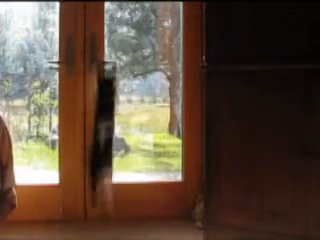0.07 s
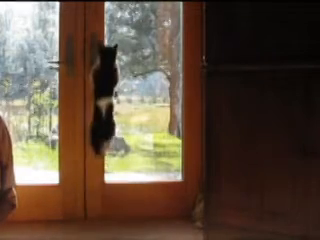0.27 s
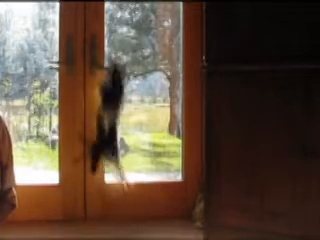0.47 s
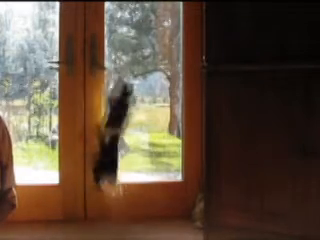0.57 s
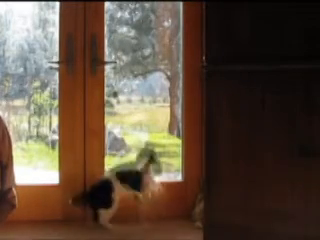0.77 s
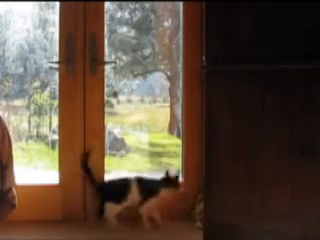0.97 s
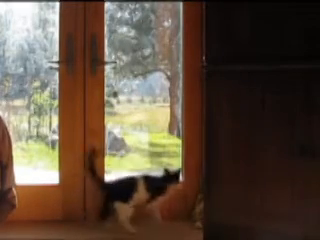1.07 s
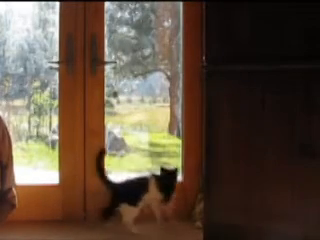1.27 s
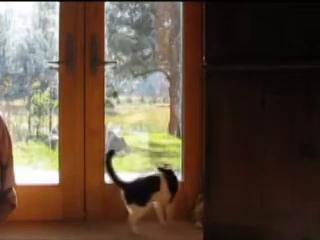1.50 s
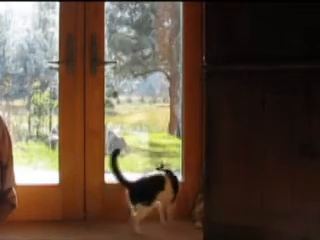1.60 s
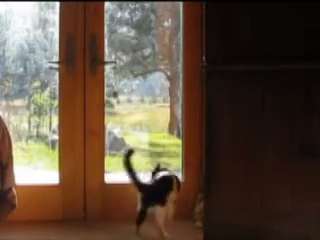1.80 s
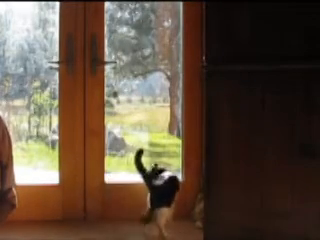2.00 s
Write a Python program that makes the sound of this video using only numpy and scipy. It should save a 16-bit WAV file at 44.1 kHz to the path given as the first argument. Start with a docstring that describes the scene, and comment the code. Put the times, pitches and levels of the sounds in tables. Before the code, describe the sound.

Quick thumps and rattles come from a glass door as a cat jumps at it, claws clicking. A thud on the floor follows, then soft footfalls and one faint mew, over the hum and hiss of a quiet room.

```python
"""Over the low hum and hiss of a quiet room, a cat leaps at a glazed wooden door.
Each impact shoves the door, excites the modes of its wood and rattles pane and handle; claws tick
and paws slide down the glass. The cat lands, the floor thuds and clatters, and the room reverberates.
It walks off with soft footfalls and mews faintly, the overtones swelling as its mouth opens."""
import sys
import numpy as np
from scipy import signal
from scipy.fft import rfft, irfft
from scipy.io import wavfile
from scipy.ndimage import uniform_filter1d

SR = 44100
rng = np.random.default_rng(int(sys.argv[2]) if len(sys.argv) > 2 else 0)


def generate_wav(signal):
    """Clip the signal to [-1, 1] and save it as 16-bit WAV at the path in sys.argv[1]."""
    frames = np.transpose(np.atleast_2d(signal))
    scaled = np.clip(frames, -1, 1) * 32767
    pcm = np.round(scaled).astype(np.int16)
    wavfile.write(sys.argv[1], SR, pcm)


N = 90404
DECAY_SAMPLES = 36000
SHOVE_RISE_S = 0.0056

# low modes of the floor (frequency [Hz], level [dB], t60 [s])
FLOOR_SWAY = [(31.94, -11, 1), (47.3, -12, 0.35), (70.85, -10, 0.96), (91.1, 0.5, 0.37),
              (110.6, -10.5, 0.22), (129, -14.5, .6)]


def door():
    """Impact excitation: the cat sets the door vibrating, and the loose pane and handle rattle."""
    # impacts (time [s], shove level [dB], knock level [dB], rattle level [dB])
    hits = [(.208, -30, -31, -44), (.213, -22, -34.5, -41), (.226, -19.5, -30.5, -56),
            (.237, -19.5, -27, -25), (.263, -15.5, -31.5, -38), (.427, -20, -61, -18.5),
            (.432, -18, -19.5, -11), (.4375, -24, -15.5, -16.5), (.445, -13.5, -18.5, -12.5),
            (.451, -28, -25, -11), (.463, -9, -33, -12), (.469, -9, -20.5, -13.5), (.495, -17, -34.5, -28),
            (.503, -12, -22.5, -48), (.551, -12.5, -30, -45)]
    # low modes of the whole door (frequency [Hz], level [dB], t60 [s])
    sway = [(14, -3.5, 1), (30.6, -10, 0.26), (39, -6.5, .35), (53.3, -0.5, 0.068), (96.3, -5.5, 0.94),
            (112, -2.5, 0.083)]
    # modes of the wood (frequency [Hz], level [dB], t60 [s])
    modes = [(180.5, -4, 0.43), (210.5, -7.5, 0.24), (305, -3, 0.26), (323, -15, 0.9), (356, -12.5, 0.91),
             (447, -9, 0.12), (519, -15.5, 0.64), (581, -24.5, 0.49), (710, -33, 0.13), (813, -18.5, 0.21),
             (1106, -9, 0.063)]
    # resonances driven by the rattle (frequency [Hz], t60 before the cap [s], gain [dB])
    peaks = [(1342, .25, -10), (3521, 0.087, 6), (3920, 0.15, -9), (4060, 0.083, -1), (4786, 0.12, 0),
             (5520, 0.28, 3), (5556, .15, 10)]
    # rattle spectrum (frequency [Hz], level [dB])
    spectrum = [(60, -25), (250, 10), (600, 7.5), (900, -8.5), (1500, -0.5), (3000, 2), (4500, -2),
                (7000, -7.5), (9000, -14.5), (12000, -16.5)]
    return impacts(hits, sway, modes, peaks, spectrum, t60=0.039, room_db=-14.5)


def landing():
    """Impact excitation: paws and body strike the floor, which rings in its damped modes."""
    # impacts (time [s], shove level [dB], knock level [dB], clatter level [dB])
    hits = [(.662, -13, -73, -77), (.686, -15.5, -29, -28), (.690, -17.5, -26, -15),
            (.695, -28, -31.5, -11.5), (.702, -22.5, -13, -9.5), (.7105, -15.5, -16, -18.5),
            (.717, -47, -19.5, -10.5), (.738, -21, -18, -22), (.762, -47, -27, -23),
            (.775, -26.5, -19, -27), (.836, -28, -25, -30.5), (.848, -28.5, -37.5, -36),
            (.868, -29.5, -28.5, -48), (.908, -25.5, -50, -67)]
    # modes of the floor's wood (frequency [Hz], level [dB], t60 [s])
    modes = [(166.4, -20, 0.97), (217.5, -4.5, 0.19), (301, -6.5, 0.54), (343.1, -11.5, 0.49),
             (423, -22, 1), (465, -19, 0.39), (522, -13, 0.34), (601, -15, 0.31), (770, -15.5, 0.21),
             (820, -6.5, 0.12), (1020, -7, 0.14), (1173, -16.5, 0.24)]
    # resonances driven by the clatter (frequency [Hz], t60 before the cap [s], gain [dB])
    peaks = [(1840, 0.32, 2.7), (2070, 0.53, 2.3), (2270, 0.1, 2.3), (2380, 0.36, 1.7), (2900, 0.12, 3),
             (3155, 0.55, 2.7), (3918, 0.11, 3), (4145, 0.59, 2.6)]
    # clatter spectrum (frequency [Hz], level [dB])
    spectrum = [(60, 6), (250, 8), (600, -0.5), (1000, -1), (1500, 2), (2800, 0), (4300, 1), (5800, -6.5),
                (8000, -10), (12000, -16)]
    return impacts(hits, FLOOR_SWAY, modes, peaks, spectrum, t60=0.05, room_db=-8)


def impacts(hits, sway, modes, peaks, spectrum, t60, room_db):
    """Superposition: each blow adds a shove, a knock and a clatter that drives high resonances."""
    # spectrum of a knock's dull core (frequency [Hz], level [dB])
    thump_spectrum = [(60, 6), (170, -32), (320, 9), (430, -11), (570, 1), (720, -11), (1200, -9.5),
                      (3000, -23), (12000, -75)]
    body, clatter = np.zeros((2, 2, N))
    shove, knock = ring(sway, SHOVE_RISE_S), ring(modes, rise_s=0.00033)
    for s, shove_db, knock_db, clatter_db in hits:
        thump = amp(-0.5) * contact(thump_spectrum, t60=0.13, room_db=-20)
        add(body, s, amp(shove_db) * shove + amp(knock_db) * (knock + thump))
        add(clatter, s, amp(clatter_db) * contact(spectrum, t60, room_db))
    for hz, peak_t60, db in peaks:
        q = np.pi * hz * min(peak_t60, 0.3) / np.log(1000)  # t60 capped at 0.3 s
        body += amp(db) * signal.lfilter(*signal.iirpeak(hz, q, fs=SR), clatter)
    return body + clatter


def contact(spectrum, t60, room_db):
    """Exponential decay: a collision radiates a noise burst, followed by the room's reverberation."""
    t = np.arange(DECAY_SAMPLES) / SR
    direct = noise(spectrum, DECAY_SAMPLES) * amp(-60 * t / t60) * onset(t, rise_s=0.0005)
    return direct + amp(room_db) * room_tail(spectrum) * onset(t, rise_s=0.0033)


def ring(modes, rise_s):
    """Modal vibration: a struck object sounds as a sum of damped sinusoids."""
    t = np.arange(DECAY_SAMPLES) / SR
    partials = (amp(db - 60 * t / t60) * np.sin(2 * np.pi * hz * t) for hz, db, t60 in modes)
    return onset(t, rise_s) * sum(partials)


def claws():
    """Impact and friction: claws tick on glass and handle, and paws scrape down the pane."""
    # claw strikes (time [s], level [dB])
    ticks = [(.2355, -20), (0.2389, -19), (0.2444, -22), (0.4258, -24), (.433, -37), (0.4456, -28),
             (.464, -28), (0.479, -14.5), (.540, -15), (0.543, -31), (0.569, -28), (0.5972, -20)]
    # tick spectrum (frequency [Hz], level [dB])
    tick_spectrum = [(200, 29), (1000, 7.5), (2000, 14.5), (4000, 11.5), (6000, 10.5), (7600, 10),
                     (9000, -2), (12000, -0.5)]
    # paw slides (time [s], duration [s], level [dB])
    slides = [(0.282, 0.18, -45.5), (0.51, 0.24, -47.5)]
    # friction spectrum (frequency [Hz], level [dB])
    slide_spectrum = [(200, -10), (1000, -2), (3000, -7), (5500, -2.5), (8000, -17), (12000, -22)]
    out = np.zeros((2, N))
    for s, db in ticks:
        add(out, s, amp(db) * contact(tick_spectrum, t60=0.022, room_db=-20))
    for s, duration, db in slides:
        add(out, s, amp(db) * swell(noise(slide_spectrum, DECAY_SAMPLES), duration))
    return out


def footfalls():
    """Soft contact: a gently applied force excites only the floor's low modes."""
    # steps (time [s], level [dB])
    steps = [(1.045, -31.5), (1.185, -37), (1.315, -31.5), (1.386, -36.5), (1.855, -39)]
    out, shove = np.zeros((2, N)), ring(FLOOR_SWAY, SHOVE_RISE_S)
    for s, db in steps:
        add(out, s, amp(db) * shove)
    return out


def mew():
    """Voiced sound: a harmonic series with some rasp, whose overtones swell as the mouth opens."""
    # course of the call (time [s], pitch [Hz], level [dB], overtone gain [dB])
    call = [(1.699, 843, -50, -6), (1.735, 890, -50, -2), (1.761, 897, -37, -3), (1.801, 946, -43.5, -0.5),
            (1.83, 967, -44.5, 11.5), (1.87, 946, -39, -3.5), (1.901, 895, -38.5, -6.5),
            (1.94, 894, -35.5, -11), (1.969, 903, -35, -20), (2.004, 885, -51, -5),
            (2.017, 886, -36.5, -24), (2.05, 899, -36.5, -14)]
    # harmonics from the fundamental up (level [dB])
    harmonics = [1.5, 1.5, -12.5, -22]
    # rasp spectrum (frequency [Hz], level [dB])
    rasp_spectrum = [(200, -30), (900, 5), (1500, -2.5), (1900, 3.5), (2400, -12), (3000, -1), (4000, -9.5),
                     (5500, -14), (12000, -26)]
    t = np.arange(N) / SR
    s, hz, db, mouth_db = np.transpose(call)
    phase = wavering_phase(np.interp(t, s, hz), wander=0.0051)
    flutter = 1 + 0.26 * drift(samples=150)
    mouth = amp(np.interp(t, s, mouth_db)) * flutter
    voice = sum(amp(level) * (mouth if k > 1 else 1) * np.sin(k * phase)
                for k, level in enumerate(harmonics, 1))
    rasp = amp(-12.5) * noise(rasp_spectrum, N)
    voice = (voice + rasp) * amp(np.interp(t, s, db, left=-120))
    tail = room_tail([(100, 0), (12000, 0)])  # flat spectrum
    reverberation = signal.fftconvolve(voice, tail / np.linalg.norm(tail[0]), axes=1)[:, :N]
    return voice + amp(-13) * reverberation


def room_tail(spectrum):
    """Reverberation: each band of the diffuse field dies away at its own rate."""
    # reverberation time (frequency [Hz], t60 [s])
    room_t60 = [(100, 1), (350, 0.62), (800, 0.55), (2000, 0.33), (4500, 0.32), (7000, 0.27), (12000, 0.21)]
    hz, t, bands = signal.stft(noise(spectrum, DECAY_SAMPLES), SR, nperseg=256)
    decay = amp(-60 * t / read(room_t60, hz)[:, None])
    return signal.istft(bands * decay, SR, nperseg=256)[1][:, :DECAY_SAMPLES]


def background():
    """Ambient noise: hiss, a wavering hum, faint passing tones and two close high tones that beat."""
    # hiss spectrum (frequency [Hz], level [dB])
    hiss_spectrum = [(20, -18), (65, -16.5), (90, -19), (170, -13), (290, -14), (350, -24), (500, -20.5),
                     (800, -25.5), (2500, -29), (6300, -34.5), (9000, -37.5), (12000, -42)]
    # hum envelope (time [s], level [dB])
    hum_level = [(0, -33.5), (.1, -46), (.2, -33.5), (.9, -36.5), (1.05, -37), (1.121, -41.5),
                 (1.22, -35.5), (1.29, -44), (1.36, -36), (1.571, -34.5), (1.66, -41.5), (1.74, -52),
                 (1.80, -33), (1.85, -39.5), (1.92, -37), (2.05, -33)]
    # beating pair (frequency [Hz], level [dB])
    whine = [(7854, -58), (7881, -61)]
    # passing low tones (time [s], duration [s], frequency [Hz], level [dB])
    tones = [(0, 0.15, 286.6, -39), (1.22, 0.13, 490, -48.5), (1.245, 0.2, 297.5, -46),
             (1.523, 0.18, 438, -52), (1.548, 0.29, 225.5, -43.5), (1.73, 0.16, 257.2, -41),
             (1.873, 0.23, 296.7, -46.5), (1.91, 0.08, 455, -50.5)]
    out = amp(-45) * noise(hiss_spectrum, N, coherence=[(300, 0.99), (2000, 0.42), (12000, 0.42)])
    phase = wavering_phase(hz=123, wander=0.035)
    hum = np.sin(phase) + amp(-11.5) * np.sin(phase / 2)  # with the octave below
    out += amp(np.interp(np.arange(N) / SR, *np.transpose(hum_level))) * hum
    out += sum(amp(db) * np.sin(wavering_phase(hz, wander=0.00103)) for hz, db in whine)
    for s, duration, hz, db in tones:
        add(out, s, amp(db) * swell(np.sin(wavering_phase(hz, wander=0.035)), duration))
    return out


def noise(spectrum, size, coherence=None):
    """Partial coherence: coloured stereo noise of rms 1, mixed from a common and an opposed part."""
    # likeness of left and right (frequency [Hz], coherence [0-1])
    usual_coherence = [(100, 1), (300, .999), (700, 0.95), (1400, 0.92), (2800, 1), (5500, 0.36),
                       (9000, 0.63), (12000, 0.78)]
    hz = np.fft.rfftfreq(size, 1 / SR)
    likeness = read(coherence or usual_coherence, hz)
    mid, side = rfft(rng.standard_normal((2, size)))
    mid, side = mid * np.sqrt(1 + likeness), side * np.sqrt(1 - likeness)
    return unit(irfft(np.array([mid + side, mid - side]) * amp(read(spectrum, hz)), size))


def wavering_phase(hz, wander):
    """Frequency modulation: the phase of a tone whose pitch strays by the rms fraction wander."""
    return 2 * np.pi * np.cumsum(hz * (1 + wander * drift(samples=300))) / SR


def drift(samples):
    """Low-pass filtering: a moving average turns white noise into a slower fluctuation."""
    return unit(uniform_filter1d(rng.standard_normal(N), size=samples))


def swell(sound, duration):
    """Amplitude modulation: the sound rises and falls under half a sine wave."""
    envelope = np.sin(np.pi * np.arange(0, duration, 1 / SR) / duration)
    return envelope * sound[..., :len(envelope)]


def onset(t, rise_s):
    """Exponential rise with time constant rise_s."""
    return 1 - np.exp(-t / rise_s)


def amp(db):
    """Decibels to amplitude ratio."""
    return 10 ** (np.asarray(db) / 20)


def unit(x):
    """Normalisation to rms 1."""
    return x / np.sqrt(np.mean(x ** 2) + 1e-20)


def read(points, hz):
    """Interpolation on a log-frequency axis."""
    f, value = np.transpose(points)
    return np.interp(np.log(hz + 1), np.log(f + 1), value)


def add(mix, s, sound):
    """Superposition of a sound on the mix from time s."""
    part = mix[:, round(s * SR):][:, :sound.shape[-1]]
    part += sound[..., :part.shape[1]]


def scene():
    """Superposition: the sound pressures of all sources add."""
    return door() + landing() + claws() + footfalls() + mew() + background()


def record(dry):
    """Band limiting and saturation: the microphone drops the deepest sway, rounds peaks, cuts treble."""
    low_cut_hz, ceiling, high_cut_hz = 12, 0.85, 11950
    dry = signal.lfilter(*signal.butter(2, low_cut_hz, "high", fs=SR), dry)
    rounded = dry / (1 + (dry / ceiling) ** 4) ** 0.25
    low_pass = signal.firwin(401, high_cut_hz, window=("kaiser", 9), fs=SR)
    return signal.oaconvolve(rounded, low_pass[None], "same")


dry = scene()
out = record(dry)
generate_wav(out)
```